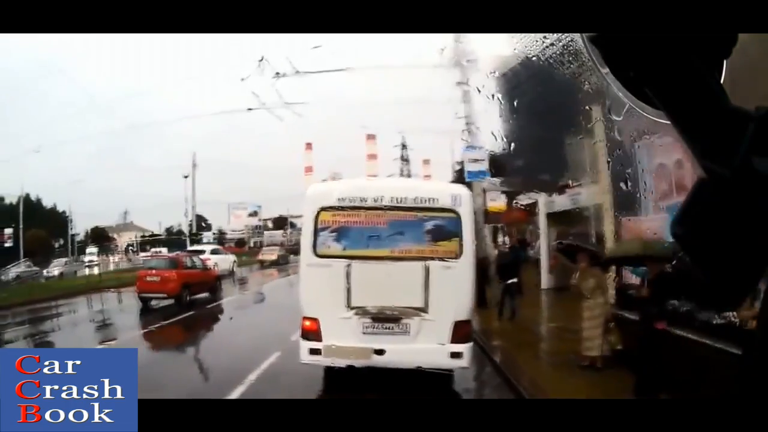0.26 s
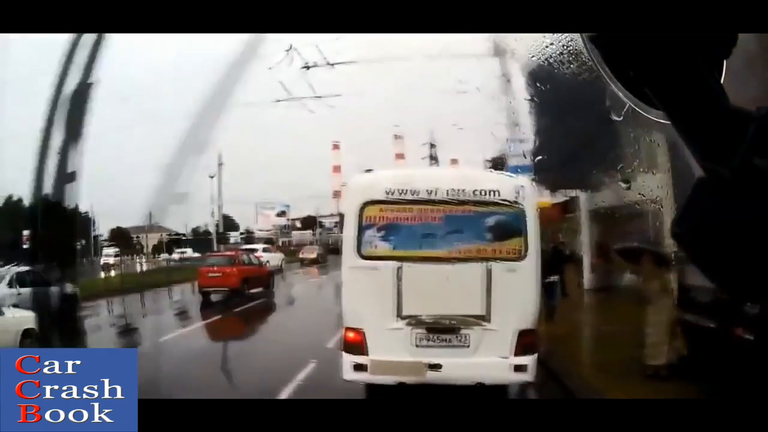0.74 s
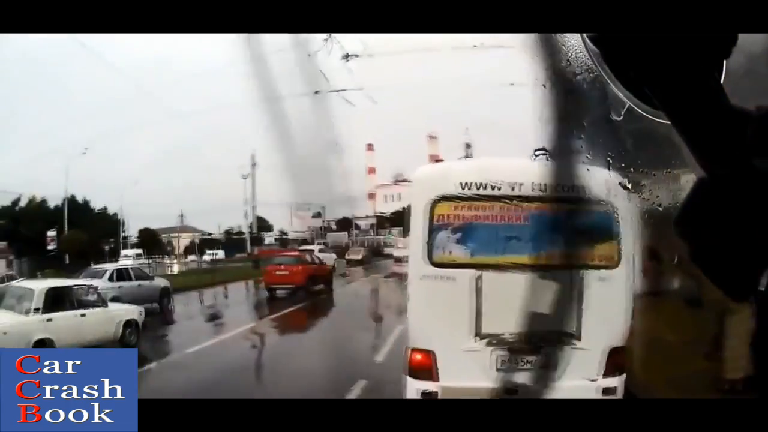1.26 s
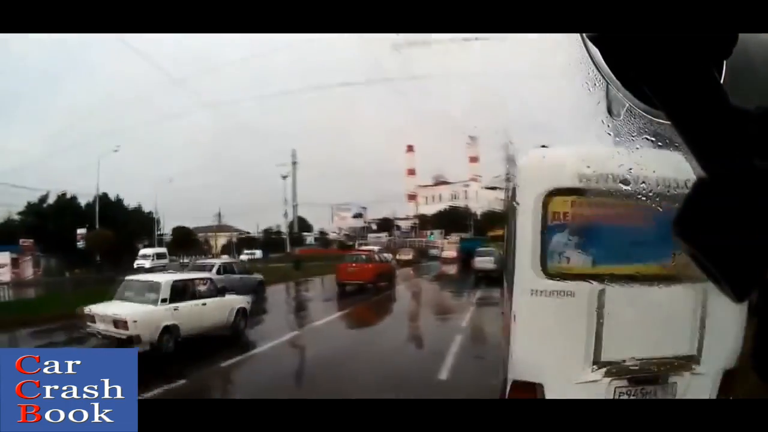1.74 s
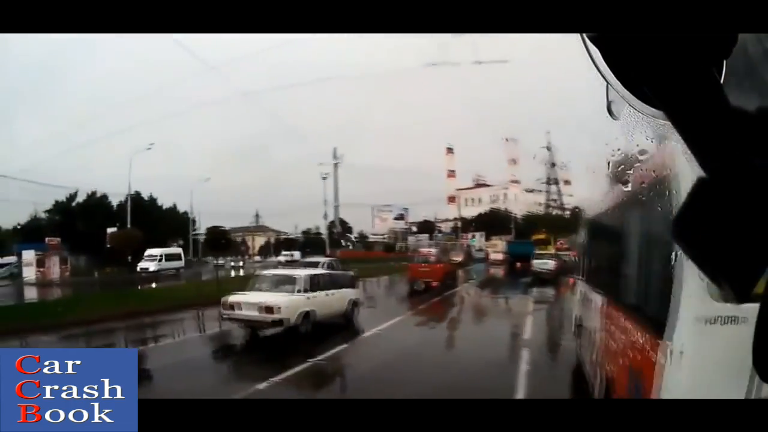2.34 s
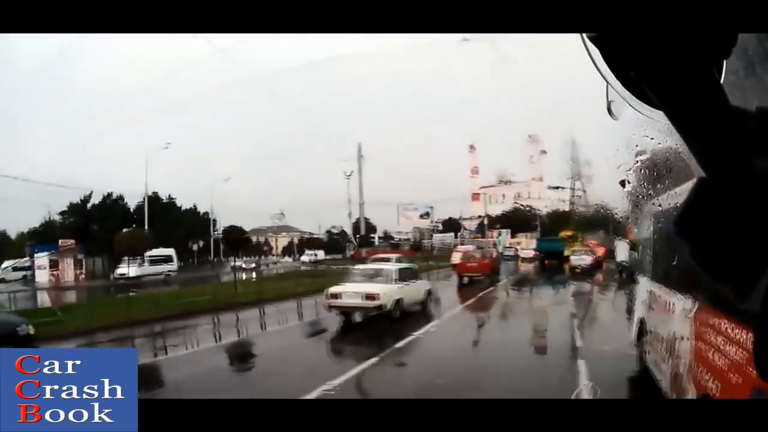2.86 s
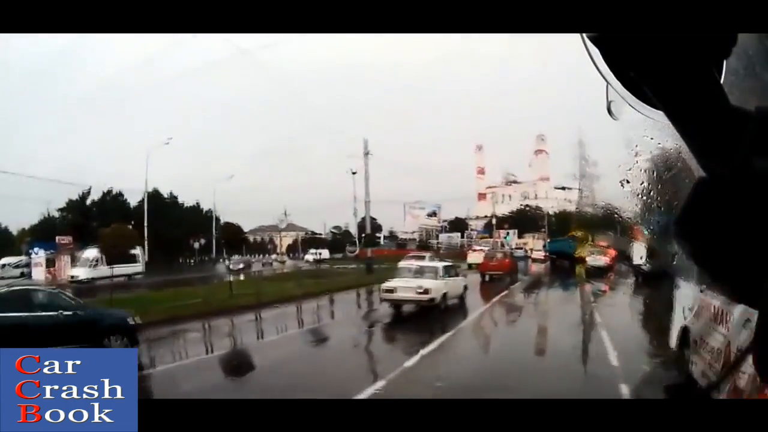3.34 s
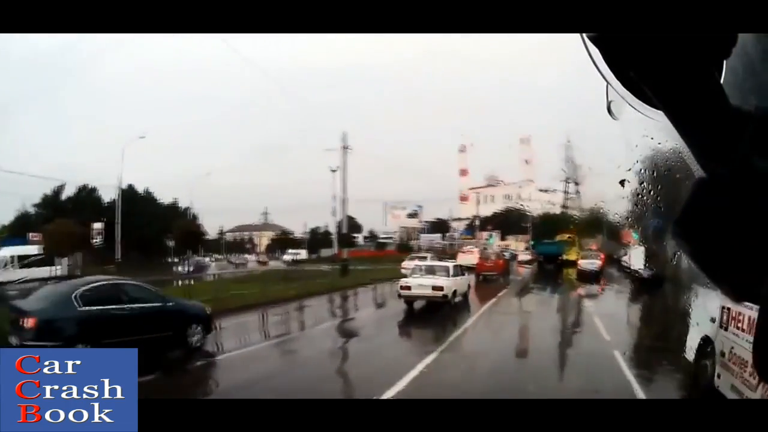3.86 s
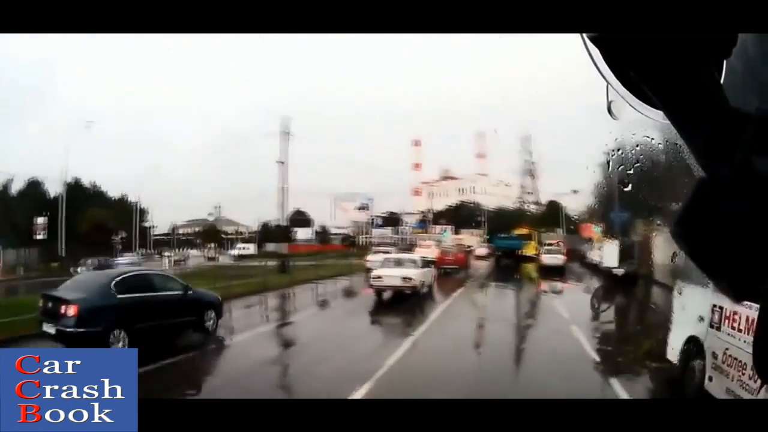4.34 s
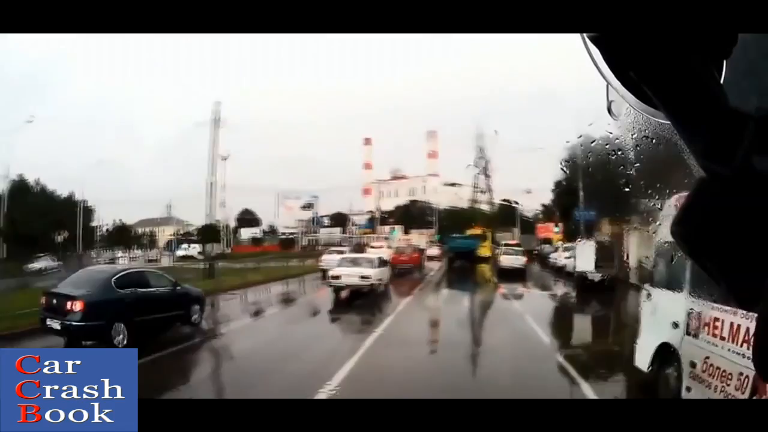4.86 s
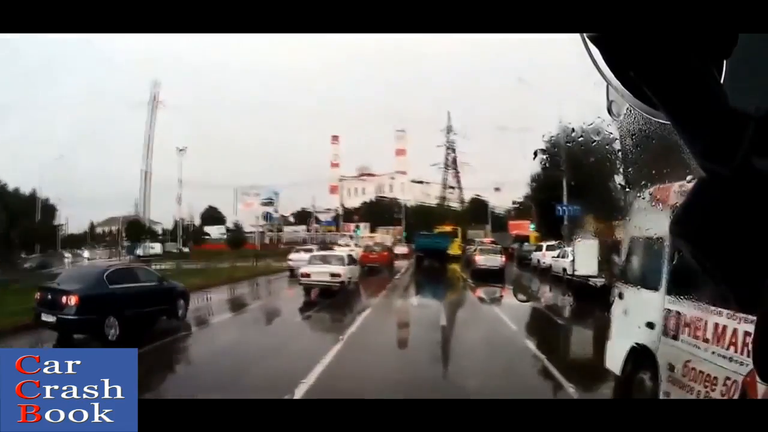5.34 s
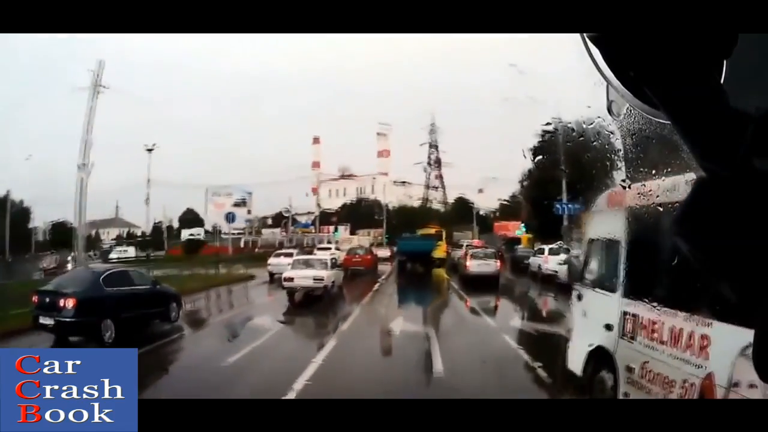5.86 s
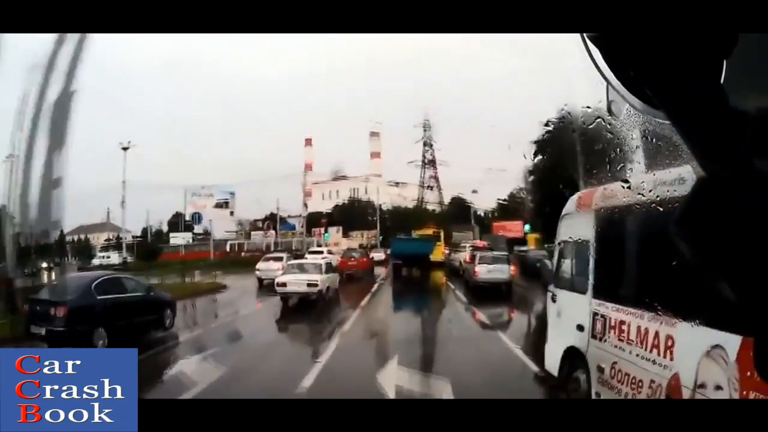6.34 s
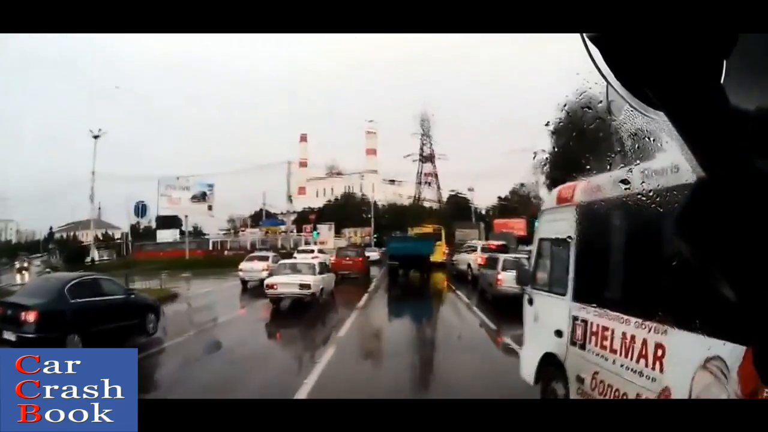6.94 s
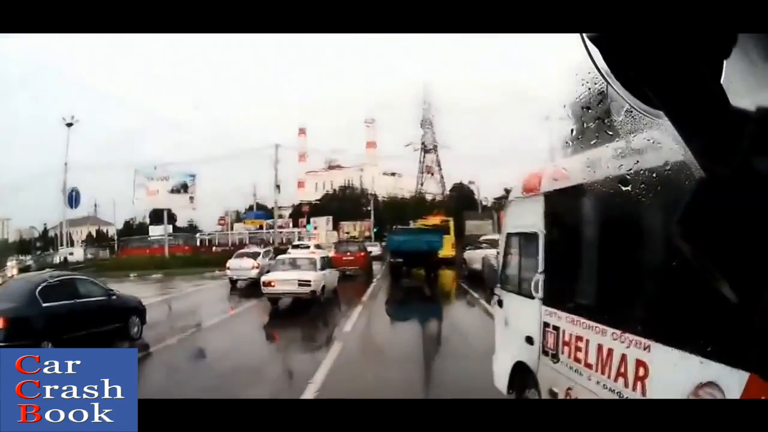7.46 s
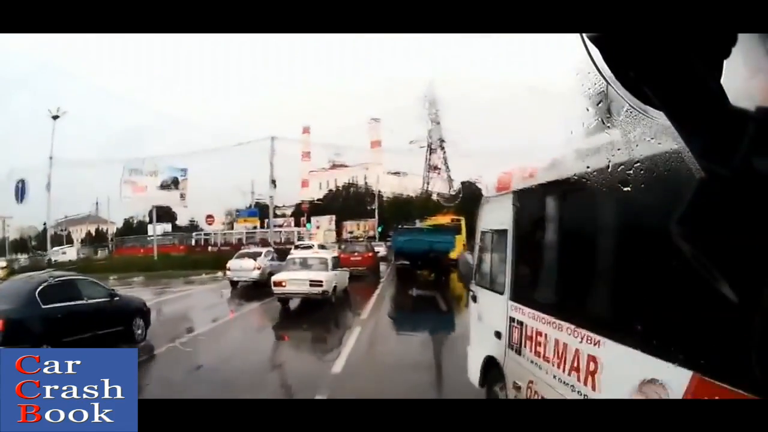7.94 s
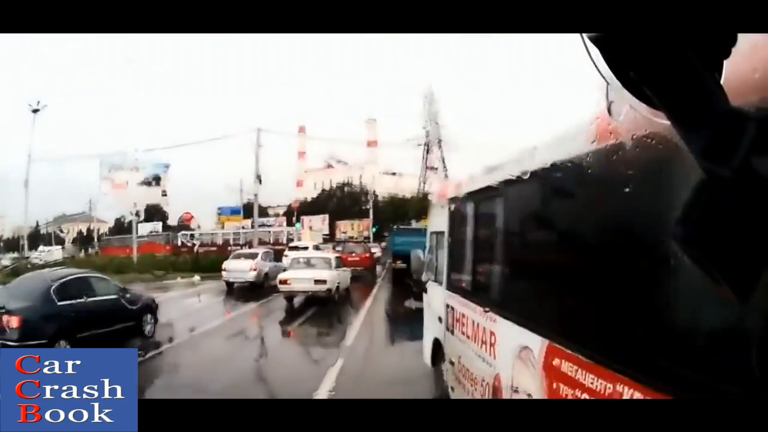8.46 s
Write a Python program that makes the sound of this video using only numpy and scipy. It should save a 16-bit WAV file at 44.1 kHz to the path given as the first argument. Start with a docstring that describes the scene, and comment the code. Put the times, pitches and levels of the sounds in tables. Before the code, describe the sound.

The microphone is inside a vehicle on a wet street. A low engine idle booms in the cab over road rumble and soft tyre wash. At about 1.4 seconds the cab jolts with a thud and clatter. From around 2.5 seconds the engine pulls away, rising in pitch until just after 5 seconds, changes gear near 6 and slows from 7. Plastic trim ticks now and then, and the wheels bump softly over seams. At about 7.4 seconds several horns blare together, loud and buzzing, overloading the microphone, while the cab knocks and rattles and the tyres scrub briefly, peaking near 7.8. Just after 8 seconds one horn gives way to a lower note. From 8.4 seconds a quick run of thuds and panel crunches ends the blast at about 8.6.

```python
"""Several horns blare together, their diaphragms buzzing, as a minibus cuts in on a wet city street.
One drops to a lower note, and the blast, overloading the microphone, ends in a crunching bump.
We sit inside a vehicle, at the windscreen. Before the horns its engine pulls away, changes gear
and slows, booming in the cab over road rumble and tyre wash; the cab jolts and its trim ticks."""
import sys
import numpy as np
from scipy import signal
from scipy.fft import rfft, irfft, next_fast_len
from scipy.io import wavfile
from scipy.ndimage import uniform_filter1d

SR = 44100
rng = np.random.default_rng(int(sys.argv[2]) if len(sys.argv) > 2 else 0)


def store_wav(level_fs):
    """Save 16-bit WAV to argv[1]."""
    pcm = np.round(np.clip(np.atleast_2d(level_fs), -1, 1) * 32767)
    wavfile.write(sys.argv[1], SR, pcm.T.astype(np.int16))


N = 384111
T = np.arange(N) / SR


def undb(db):
    """Decibels to gain."""
    return np.exp(np.asarray(db) * (np.log(10) / 20))


def unit(x):
    """Scale to rms 1."""
    return x / np.sqrt(np.mean(x ** 2))


def automation(points):
    """A control curve through (t/s, value) breakpoints."""
    return np.interp(T, *np.transpose(points))


def gain_at(hz, eq):
    """Gain of an EQ curve (f/Hz, level/dB), falling 30 dB an octave beyond its ends."""
    f, db = np.transpose(eq)
    octave, knots = np.log2(np.maximum(hz, 1)), np.log2(f)
    outside = np.abs(octave - np.clip(octave, knots.min(), knots.max()))
    return undb(np.interp(octave, knots, db) - 30 * outside)


def colour(x, eq):
    """Apply an EQ curve, keeping the power of white noise."""
    size = next_fast_len(N + SR // 10)
    hz = np.arange(size // 2 + 1) * SR / size
    return irfft(rfft(x, size) * unit(gain_at(hz, eq)), size)[:N]


def noise(eq):
    """Coloured noise of rms 1."""
    return colour(rng.standard_normal(N), eq)


def wander(rate):
    """Random modulation of rms 1, gliding to a new value `rate` times a second."""
    steps = rng.standard_normal(8192)
    return unit(np.interp(T * rate, np.arange(len(steps)), steps))


def swells(rows):
    """Bell-shaped envelopes, one for each (t/s, half-width/s, level/dB)."""
    out = np.zeros(N)
    for s, width, db in rows:
        near = np.abs(T - s) < 3 * width
        out[near] += undb(db) * np.exp(-2 * ((T[near] - s) / width) ** 2)
    return out


def bursts(rows, grain_db, attack_s):
    """Noise bursts, grainy like many tiny impacts, one for each (t/s, level/dB, T60/s)."""
    envelope = np.zeros(N)
    for s, db, t60 in rows:
        first = int(s * SR)
        age = T[:min(SR, N - first)]
        attack = np.minimum(age / attack_s, 1)
        envelope[first:first + len(age)] += undb(db) * attack * undb(-60 * age / t60)
    return envelope * unit(undb(grain_db * wander(400))) * rng.standard_normal(N)


def pings(rows, t60):
    """Short sine rings, one for each (t/s, level/dB, f/Hz)."""
    out, age = np.zeros(N), T[:SR // 5]
    for s, db, hz in rows:
        first = int(s * SR)
        out[first:first + len(age)] += undb(db - 60 * age / t60) * np.sin(2 * np.pi * hz * age)
    return out


def heater_fan(hz=370.4, level_db=-47):
    """The fan hums faintly, wavering in level and pitch."""
    level = undb(level_db + 2.8 * wander(3.96))
    pitch = hz * (1 + 0.008 * wander(3))
    return level * np.sin(2 * np.pi * np.cumsum(pitch) / SR)


# Squeal cue: t/s, half-width/s, level/dB
SQUEAL = [(.12, .35, -53.5)]

def traffic_squeal():
    """A brake squeals faintly in the traffic: one narrow band of noise."""
    return swells(SQUEAL) * noise([(2680, -25), (2790, -4), (2900, -22)])


# Firing rate through idle, first gear, a change near 6 s and braking: t/s, f/Hz
FIRING_RATE = [(0.0, 25.54), (0.39, 24.1), (1.8, 24.2), (2.76, 30.02), (3.0, 33.9), (3.1, 38.44),
               (3.32, 41.85), (3.92, 57.3), (4.06, 59.68), (4.4, 70.65), (4.76, 81.54), (5.26, 91.44),
               (5.4, 87.6), (5.72, 75.2), (5.85, 68.84), (6.01, 53.46), (6.18, 60.46), (6.34, 60.6),
               (6.56, 63.95), (6.87, 65.43), (7.83, 50.7), (8.12, 39.2), (8.7, 27.8)]
# Engine load, 0 at full drive, higher when labouring, lower when slack: t/s, level/dB
LOAD = [(0, 0), (1.5, 0), (2.3, -4), (3.0, 1.5), (3.5, 0), (3.58, -9), (3.7, -13), (3.82, 5), (4.17, 5.5),
        (4.45, -4.5), (4.8, 1), (5.48, -1), (5.6, -13), (5.78, -6), (5.95, 1), (6.83, -4), (7.6, 1),
        (8.2, -4)]
# The cab's bass resonances: f/Hz, level/dB
BOOM_EQ = [(24, -10.5), (30, -10), (42, -5), (48, -4), (54, 0), (62, -3.5), (75, -7.5), (83, -1), (92, -6),
           (104, -13.5), (120, -2), (134, -9), (165, -15)]
# Growl partials: multiple of the crank's rate, level/dB
GROWL_ORDERS = [(3, -2), (5, -6), (6, 0), (6.5, -4), (7, -1), (8, 0), (9, -5), (10, 0), (11, -2.5),
                (12, -1), (12.5, -3), (14, -1), (16, -9), (18, -7)]
# Narrow cab resonances that the growl sweeps through: f/Hz, level/dB
GROWL_EQ = [(95, -7), (170, 3), (192, -7), (228, 2), (262, -2), (292, -3), (320, 1), (345, -5), (373, 2),
            (405, -11), (450, 2), (495, 0), (520, -8), (545, -3), (575, -7), (615, -1), (660, -10),
            (900, -22)]

def engine(boom_db=-17.5, octave_db=-28, growl_db=-51, growl_db_per_hz=.255):
    """The firing rate and its octave boom in the cab; higher orders growl through the bulkhead."""
    hz = uniform_filter1d(automation(FIRING_RATE), size=5000, mode="nearest")
    load_db = automation(LOAD)
    crank = np.pi * np.cumsum(hz * (1 + 0.006 * wander(40))) / SR  # two firings a turn, a bit uneven
    boom = undb(boom_db + np.minimum(load_db, 0)) * gain_at(hz, BOOM_EQ) * np.sin(2 * crank)
    bite_db = 1.88 * load_db  # hard firings are sharper
    octave = undb(octave_db + bite_db) * gain_at(2 * hz, BOOM_EQ) * np.sin(4 * crank + 1)
    throb = undb(1.24 * wander(13))
    growl = np.zeros(N)
    for order, db in GROWL_ORDERS:
        strength = undb(db + 2.8 * wander(8)) * gain_at(order * hz / 2, GROWL_EQ)
        growl += strength * np.sin(order * crank + rng.uniform(0, 2 * np.pi))
    growl_level = undb(growl_db + growl_db_per_hz * hz + 0.7 * np.maximum(load_db, 0))
    return np.sqrt(2) * throb * (boom + octave) + growl_level * unit(growl)


# Fader for rumble and wash, riding with road speed: t/s, level/dB
ROLLING = [(0, -45), (1.2, -46), (2.3, -48), (3.1, -44.5), (4.4, -40), (5.2, -39), (6.5, -39.5), (7.3, -44)]
# Rumble through the floor: f/Hz, level/dB
RUMBLE_EQ = [(21, -30), (35, -2.5), (65, -6), (92, -15.5), (119, -9.5), (156, -11), (184, -22.5),
             (225, -11.5), (272, -21), (320, -17), (348, -19), (567, -29.5), (677, -33), (900, -37),
             (1170, -48), (1980, -120)]
# Wheels crossing road seams: t/s, half-width/s, level/dB
SEAMS = [(1.14, 0.049, -30.5), (1.85, 0.07, -37.5), (4.72, 0.045, -31), (5.56, 0.062, -23),
         (5.97, 0.051, -23.5), (6.68, 0.041, -24.5)]
# Midrange wash of wet tyres: f/Hz, level/dB
WASH_EQ = [(350, -14), (600, -3.5), (671, -6.5), (919, -6.5), (1140, -11), (1830, -9.5), (2240, -12),
           (2720, -11), (3940, -30.5), (4970, -43), (5500, -36.5), (7150, -58), (12100, -120)]
# Fader for the hiss: t/s, level/dB
HISS_LEVEL = [(0, -62), (1.55, -61.5), (1.8, -69), (2.4, -69), (3.1, -62), (4.1, -57), (5.3, -60),
              (6.4, -57.5), (7.3, -59)]
# Soft swishes in the hiss: t/s, half-width/s, level/dB
SWISHES = [(.33, 0.046, -57.5), (0.825, 0.055, -49.5), (2.06, 0.05, -60), (2.44, 0.051, -61),
           (2.837, 0.048, -58), (3.08, .13, -54.5), (6.06, 0.05, -51)]
# Thin hiss on top: f/Hz, level/dB
HISS_EQ = [(2650, -29), (4500, -8), (5010, -10), (6640, 2), (8080, -2), (9230, 1.5), (11500, -12.5),
           (12500, -32), (16200, -53), (22000, -120)]

def road(rumble_db=6.5, wash_db=2):
    """The body sways, the road rumbles through the floor, wet tyres wash and hiss."""
    rolling_db = automation(ROLLING)
    shake_db = 0.4 * np.maximum(automation(LOAD), 0)  # a labouring engine shakes the floor
    sway = undb(-30 + 2.9 * wander(1.1)) * noise([(16, -6), (24, 4.5), (36, -2)])
    rumble = undb(rumble_db + .8 * rolling_db + shake_db + 1.6 * wander(12)) * noise(RUMBLE_EQ)
    seams = swells(SEAMS) * noise([(130, -9), (235, 4), (330, -3.5), (520, -13)])
    wash = undb(wash_db + rolling_db + .5 * wander(14)) * noise(WASH_EQ)
    hiss_bed = undb(automation(HISS_LEVEL) + 1.15 * wander(25))
    hiss = np.hypot(hiss_bed, swells(SWISHES)) * noise(HISS_EQ)
    return sway + rumble + seams + wash + hiss


# Trim cues: t/s, tick level/dB, rattle level/dB, ping level/dB, ping f/Hz
TICKS = [(2.79, -46, -32, -29, 1400), (3.5718, -46, -26, -29, 1401), (3.6462, -47, -37, -38, 2721),
         (5.3777, -48, -35, -34, 1601), (5.4956, -39, -37, -23.5, 2760), (5.5424, -44, -39, -36, 2000),
         (5.921, -55, -39, -30, 2700), (6.9598, -37, -28.5, -31, 2720), (7.069, -43, -34, -32, 2150)]

def trim():
    """Plastic parts knock on the dashboard: a dry tick, a short panel rattle and the part's ping."""
    tick = bursts([(s, db, .045) for s, db, *_ in TICKS], grain_db=3.5, attack_s=0.00091)
    rattle = bursts([(s, db, .065) for s, _, db, *_ in TICKS], grain_db=1, attack_s=0.0026)
    ping = pings([(s, db, hz) for s, _, _, db, hz in TICKS], t60=0.024)
    tick_eq = [(1000, 0.5), (3000, 1), (4500, -7.5), (9500, -6.5), (12000, -23)]
    panel_eq = [(500, -3), (800, -2), (1200, -2), (1400, 4.5), (1700, -0.5), (2450, 2.5),
                (2720, 4), (3050, -9)]
    return colour(tick, tick_eq) + colour(rattle, panel_eq) + ping


# Jolt cues: t/s, thud level/dB, clatter level/dB, jingle level/dB, ring level/dB, burst T60/s
JOLTS = [(1.357, -14, -31, -46, -45, .08), (1.371, -14, -28.5, -48, -42, .3),
         (1.426, -23, -28.5, -57, -42, 0.25), (1.461, -20, -29, -46, -45, 0.2),
         (1.475, -26, -33, -40, -50, 0.081), (1.491, -18, -34, -53, -45, .19),
         (1.52, -28, -31, -46, -46, .17), (7.35, -16, -15, -36, -19, 0.062),
         (7.429, -24, -24, -46, -13, .11), (7.683, -21, -16, -55, -15, .06),
         (7.783, -27, -15, -37, -25, 0.11), (7.803, -6.5, -24, -48, -35, 0.16)]
# Low thud of the body: f/Hz, level/dB
THUD_EQ = [(45, -5), (85, 0), (135, 1), (200, -6), (330, -17), (900, -30)]
# Loose panels: f/Hz, level/dB
CLATTER_EQ = [(200, -7), (300, -1.5), (420, 4), (700, -4.5), (1200, -8), (2700, -13), (4000, -29.5),
              (5000, -34), (7000, -29), (10000, -39), (12500, -55)]
# Small bright parts: f/Hz, level/dB
JINGLE_EQ = [(3000, -14), (5300, -13), (6900, 5), (8200, -2), (9700, -3), (12000, -21)]
# Dashboard modes: f/Hz, level/dB, T60/s
DASH_MODES = [(363, 0, .15), (476, -2, .11)]

def jolts():
    """Each jolt thuds in the body, clatters panels, jingles small parts and rings the dashboard."""
    times, thud_db, clatter_db, jingle_db, ring_db, decays = np.transpose(JOLTS)
    thud = bursts(zip(times, thud_db, decays), grain_db=0, attack_s=0.0047)
    clatter = bursts(zip(times, clatter_db, decays), grain_db=1, attack_s=0.0049)
    jingle = bursts(zip(times, jingle_db, decays), grain_db=2.5, attack_s=.003)
    ring = np.zeros(N)
    for hz, mode_db, t60 in DASH_MODES:
        ring += pings([(s, db + mode_db, hz) for s, db in zip(times, ring_db)], t60)
    return colour(thud, THUD_EQ) + colour(clatter, CLATTER_EQ) + colour(jingle, JINGLE_EQ) + ring


# Lurch cues: t/s, half-width/s, level/dB
LURCHES = [(6.833, .12, -8), (8.36, 0.27, -21)]

def lurch(hz=16.7):
    """The body lurches under the brakes: a subsonic pressure swing that overloads the microphone."""
    return swells(LURCHES) * np.sin(2 * np.pi * hz * (T - LURCHES[0][0]))


# Rubber scrubbing on wet road: f/Hz, level/dB
SKID_EQ = [(500, 1.5), (1200, -7.5), (1700, 1), (2400, 3), (3300, -9.5), (5000, -19), (7000, -20),
           (9500, -13.5), (12500, -37)]

def skid(start_s=7.36, peak_s=7.77, peak_db=-25.5, build_db_per_s=30, release_db_per_s=120):
    """Braking tyres scrub in uneven grabs, harder and harder until they let go."""
    below_peak_db = np.maximum(build_db_per_s * (peak_s - T), release_db_per_s * (T - peak_s))
    return (T > start_s) * undb(peak_db - below_peak_db + 4.1 * wander(60)) * noise(SKID_EQ)


# Collision hits: t/s, thud level/dB, crunch level/dB, T60/s
HITS = [(8.402, -21.5, -20, 0.33), (8.466, -17, -13, 0.26), (8.5, -10, -7.5, 0.15), (8.53, -15, -10, 0.17),
        (8.558, -11, -9, 0.096)]
# Crunching panels: f/Hz, level/dB
CRUNCH_EQ = [(170, 9), (450, 4.5), (900, -3), (1700, 1), (2700, -1.5), (3600, -9.5), (5000, -14.5),
             (7000, -16.5), (9500, -11.5), (12500, -34)]

def collision():
    """Each hit thuds in the body while panels crunch."""
    times, thud_db, crunch_db, decays = np.transpose(HITS)
    thud = bursts(zip(times, thud_db, decays), grain_db=0, attack_s=0.007)
    crunch = bursts(zip(times, crunch_db, decays), grain_db=5, attack_s=0.0079)
    return colour(thud, THUD_EQ) + colour(crunch, CRUNCH_EQ)


def horn(start, end, hz, start_db, end_db, fundamental_db, partials_db, attack_s=0.047, fall_s=0.034):
    """A buzzing diaphragm. Moving reflections make each partial flutter; low partials ring longest."""
    on = (T > start) & (T < end + 10 * fall_s)
    t = T[on]
    pitch = hz * (1 + 0.00051 * wander(12)[on] + 0.00058 * wander(500)[on])
    phase = 2 * np.pi * np.cumsum(pitch) / SR
    tone = np.zeros(N)
    for k, db in enumerate(partials_db, 1):
        flutter = np.interp(t, start + np.arange(64) / 14, rng.standard_normal(64))
        depth_db = min(1.2 - .1 * db, 3)  # weak partials lie in nulls, which shift most
        drift_db = (k == 1) * fundamental_db * (t - start) / (end - start)
        release = np.exp(-np.maximum(t - end, 0) * np.sqrt(k) / fall_s)
        level = undb(db + drift_db + depth_db * flutter) * release
        tone[on] += level * np.sin(k * phase + rng.uniform(0, 2 * np.pi))
    attack = np.clip((T - start) / attack_s, 0, 1)
    fader = undb(automation([(start, start_db), (end, end_db)]))
    return np.sqrt(2) * tone * attack * fader


# Horn notes: start t/s, end t/s, f/Hz, start level/dB, end level/dB,
# extra drift of the fundamental over the note/dB, each partial's level/dB
HORN_NOTES = [ (7.44, 8.59, 384.1, -26.5, -31.5, 3, [-4, -5, -6, 1, -6, -8.5, -11.5, -23, -34, -33, -39, -34, -34, -39]),
              (7.428, 8.578, 419.05, -22.5, -16.5, -13.5, [2.5, -23, -30, -23.5, -20, 1, -19, -35, -44, -49, -42, -37, -38, -40, -42, -44, -46, -34, -50, -50, -50, -35.5]),
              (7.41, 8.25, 458.5, -23, -26.5, 0.5, [1.5, -9.5, -21, -7, -21, -24, -34, -34, -33, -41, -41, -44]),
              (8.05, 8.24, 301, -34, -26, 0.5, [0, -14]),
              (8.228, 8.58, 152.8, -19.5, -23, 0, [-35, 1, -10.5, -7.5, -35, -26, -35, -23, -30])]
# Raspy edge of the blast: f/Hz, level/dB
RASP_EQ = [(180, -40), (300, -15), (436, -2), (518, -9.5), (923, -18), (1060, -11.5), (1430, -17),
           (1520, -13), (2200, -11), (2580, -8), (2790, -11), (3400, -30), (7830, -29), (12500, -35.5),
           (16200, -81)]

def horns(rasp_db=-16.7):
    """The horns blare as a cluster, with a rasp that follows their beats."""
    tones = sum(horn(*note) for note in HORN_NOTES)
    beats = np.sqrt(np.abs(uniform_filter1d(tones ** 2, size=100)))
    return tones + undb(rasp_db + 2.3 * wander(25)) * beats * noise(RASP_EQ)


def scene():
    """All layers meet in mono at one microphone."""
    drive = engine() + road() + traffic_squeal() + skid()
    blast = horns()
    cab = lurch() + heater_fan() + trim() + jolts() + collision()
    return (drive + blast + cab)[None]


def record(dry):
    """The microphone clips, so horns and bass grind together; then both ends of the range are cut."""
    ceiling, hardness = undb(-10), 12  # higher hardness gives a sharper knee
    low_cut_hz, low_cut_q = 23.9, 1.51
    roll_off_hz, top_hz = 12300, 12100
    clipped = dry / (1 + np.abs(dry / ceiling) ** hardness) ** (1 / hardness)
    w = 2 * np.pi * low_cut_hz
    resonant_low_cut = signal.bilinear([1, 0, 0], [1, w / low_cut_q, w * w], SR)
    heard = signal.lfilter(*resonant_low_cut, clipped)  # tilts the flat tops
    heard = signal.lfilter(*signal.butter(1, low_cut_hz, "high", fs=SR), heard)
    heard = signal.lfilter(*signal.butter(2, roll_off_hz, fs=SR), heard)
    return signal.sosfilt(signal.ellip(8, .2, 70, top_hz, fs=SR, output="sos"), heard)


dry = scene()
out = record(dry)
store_wav(out)
```